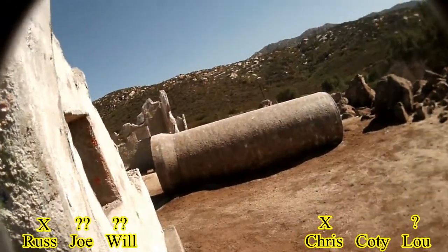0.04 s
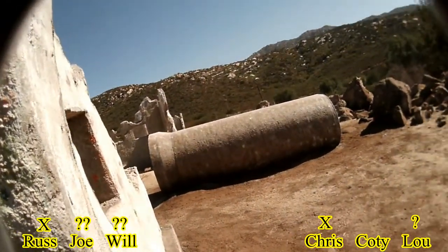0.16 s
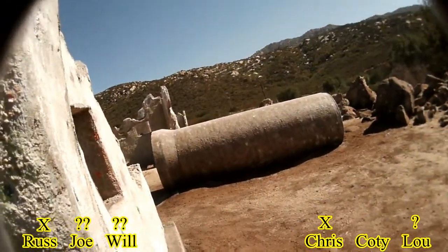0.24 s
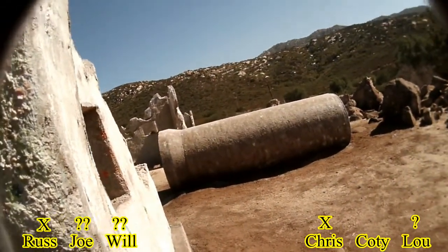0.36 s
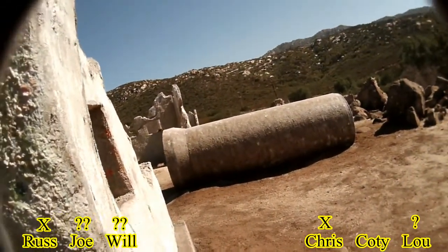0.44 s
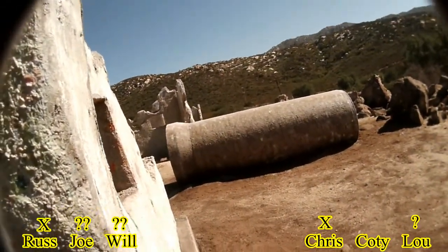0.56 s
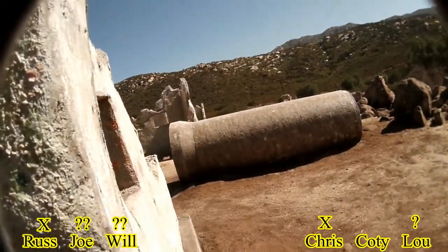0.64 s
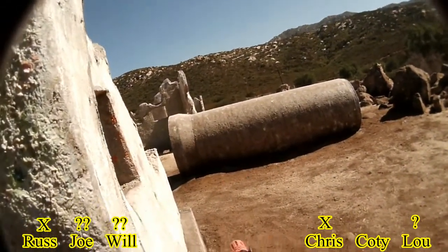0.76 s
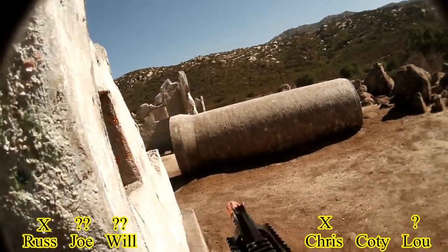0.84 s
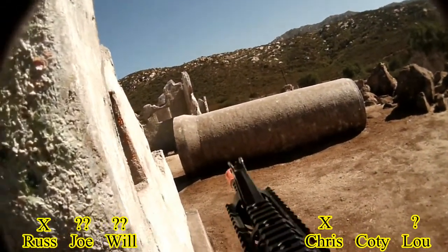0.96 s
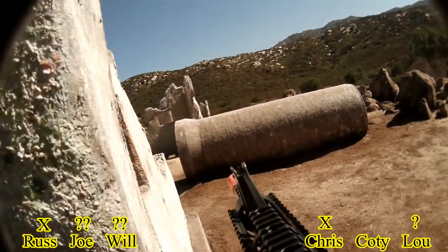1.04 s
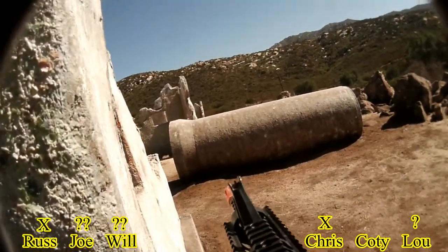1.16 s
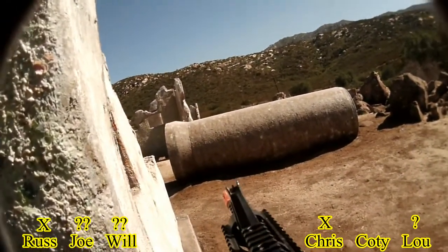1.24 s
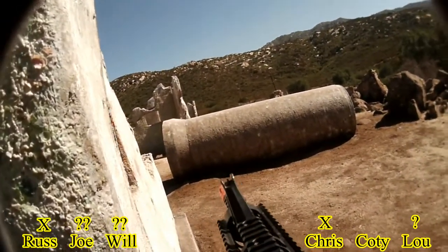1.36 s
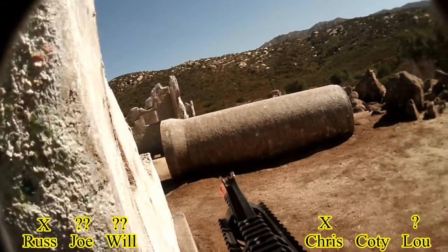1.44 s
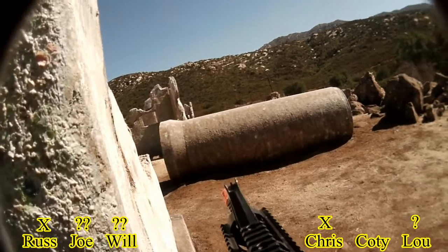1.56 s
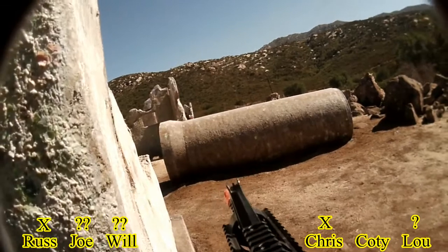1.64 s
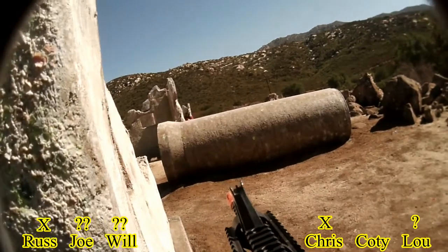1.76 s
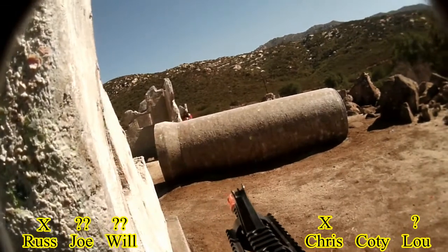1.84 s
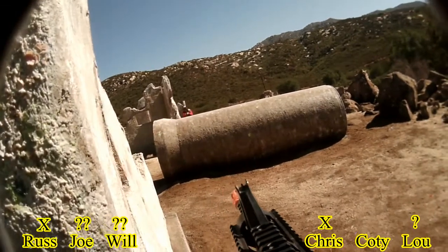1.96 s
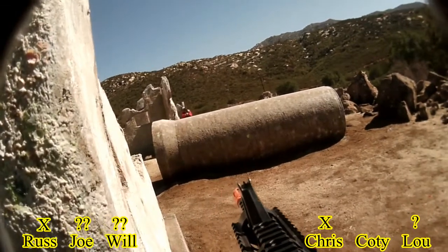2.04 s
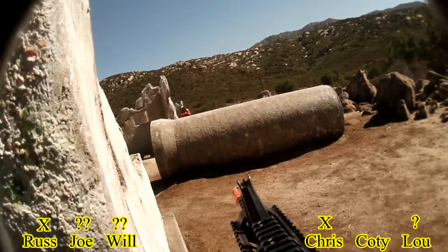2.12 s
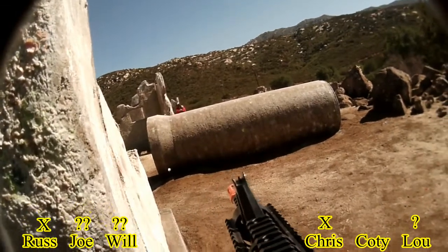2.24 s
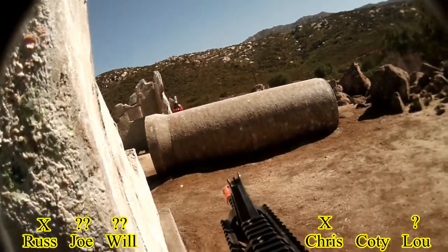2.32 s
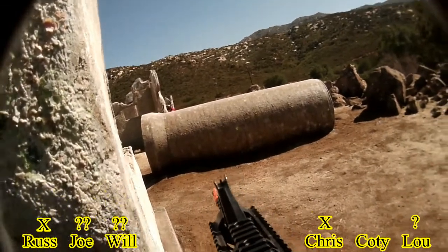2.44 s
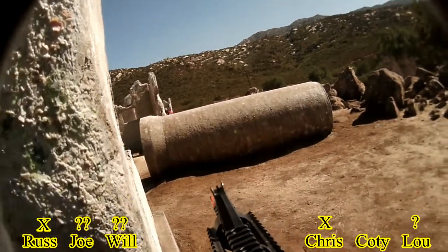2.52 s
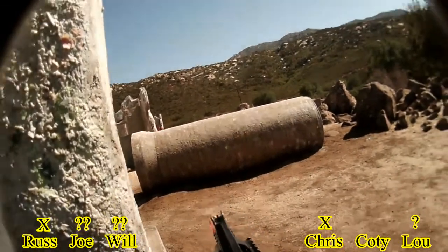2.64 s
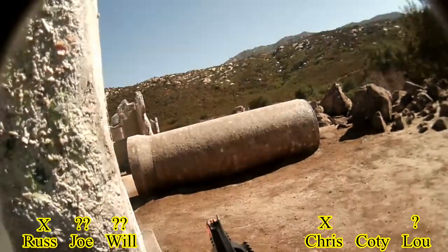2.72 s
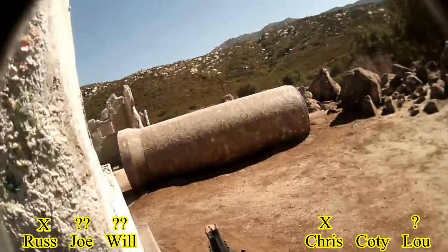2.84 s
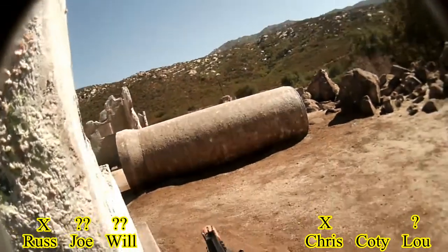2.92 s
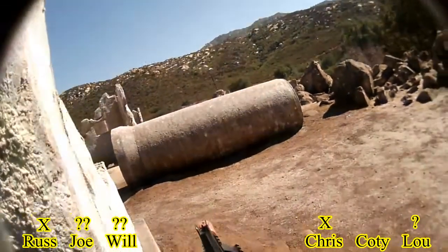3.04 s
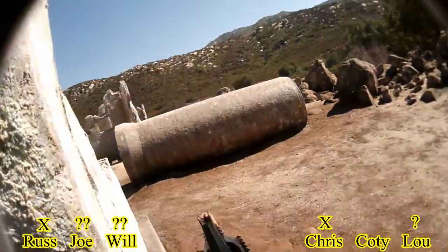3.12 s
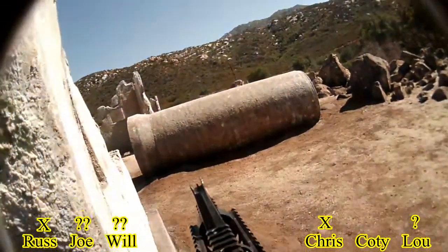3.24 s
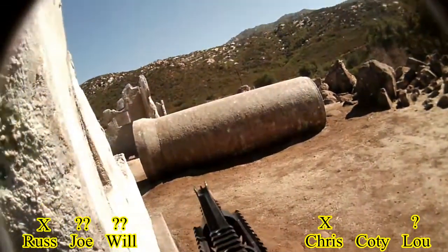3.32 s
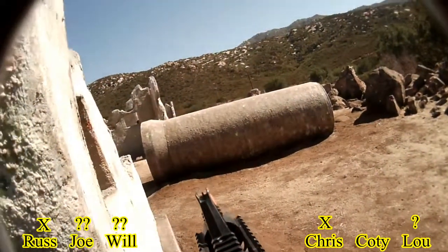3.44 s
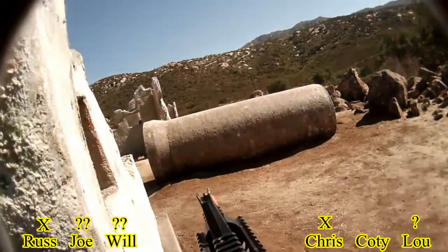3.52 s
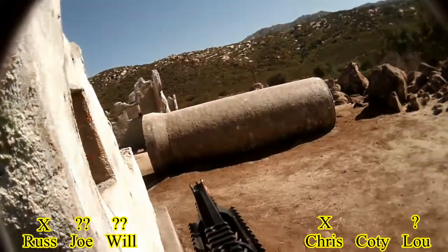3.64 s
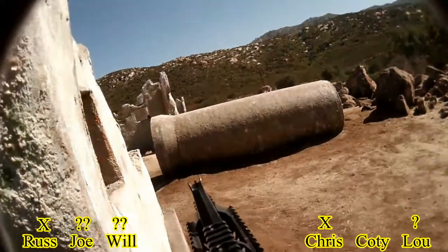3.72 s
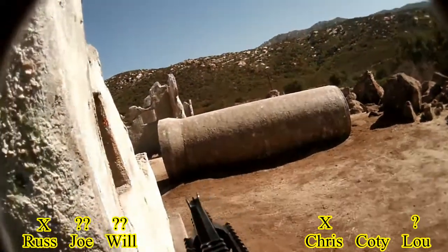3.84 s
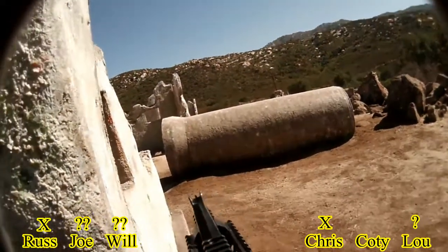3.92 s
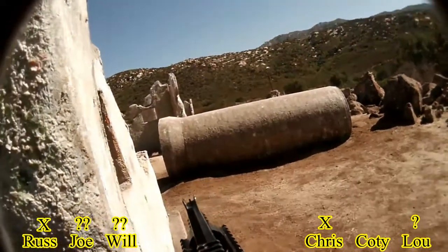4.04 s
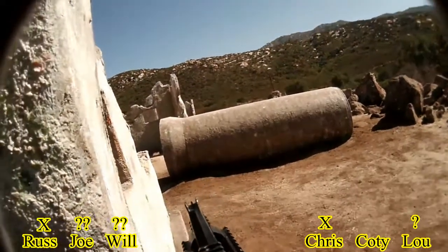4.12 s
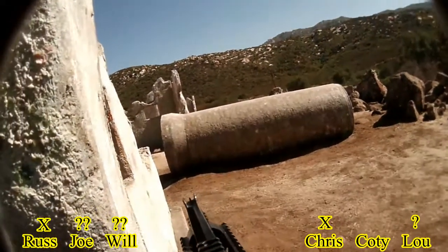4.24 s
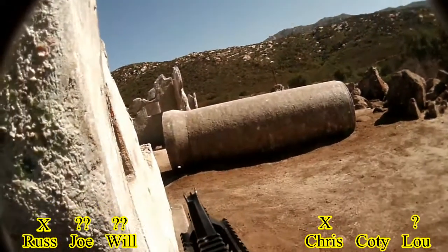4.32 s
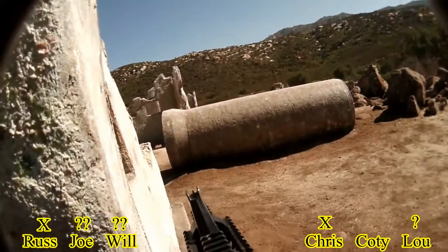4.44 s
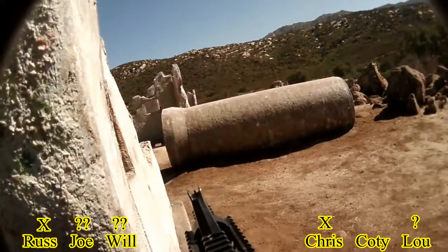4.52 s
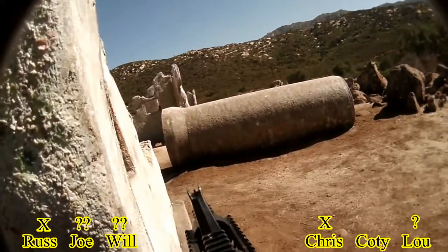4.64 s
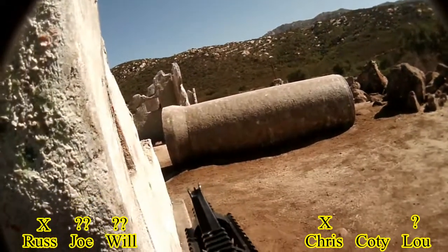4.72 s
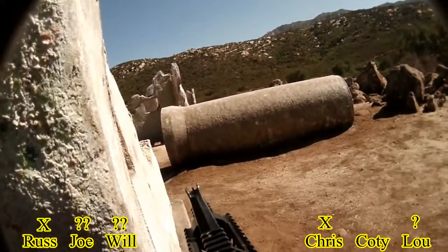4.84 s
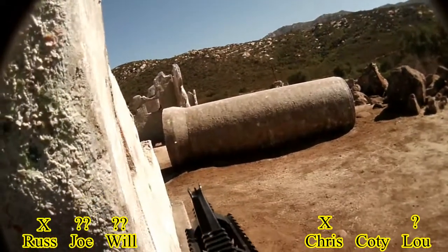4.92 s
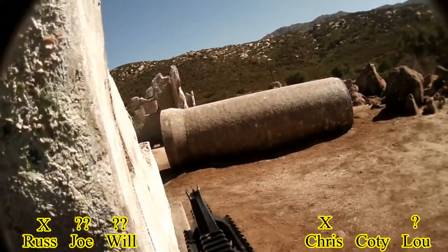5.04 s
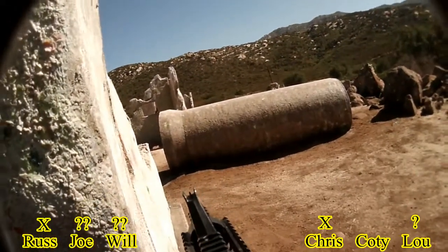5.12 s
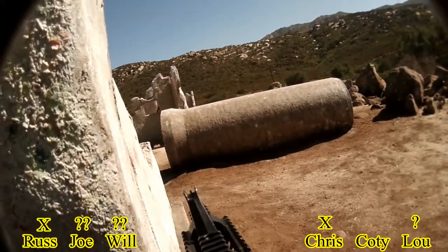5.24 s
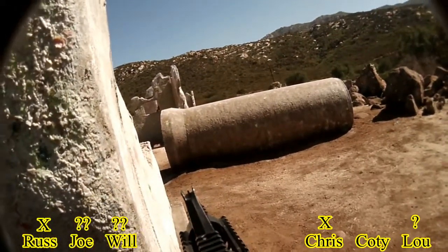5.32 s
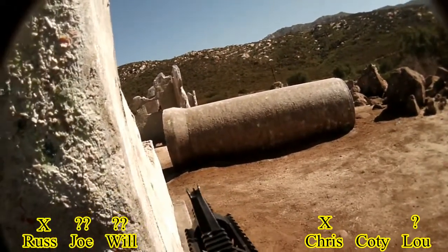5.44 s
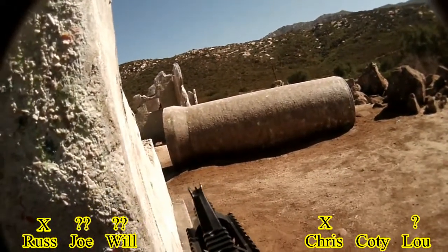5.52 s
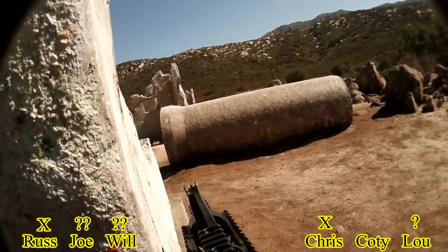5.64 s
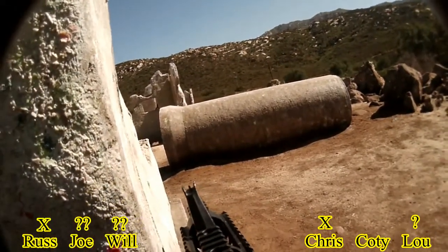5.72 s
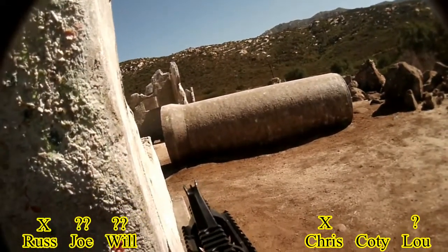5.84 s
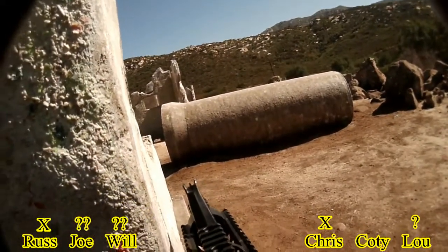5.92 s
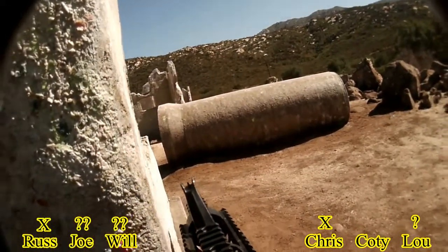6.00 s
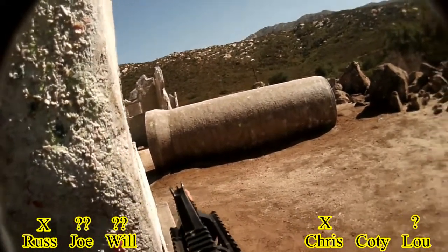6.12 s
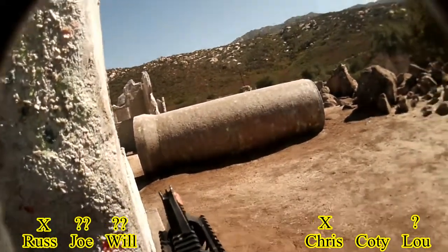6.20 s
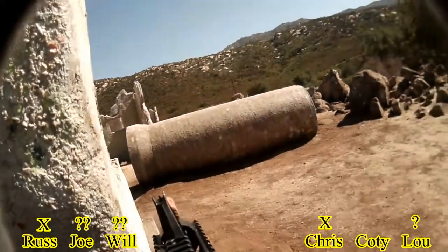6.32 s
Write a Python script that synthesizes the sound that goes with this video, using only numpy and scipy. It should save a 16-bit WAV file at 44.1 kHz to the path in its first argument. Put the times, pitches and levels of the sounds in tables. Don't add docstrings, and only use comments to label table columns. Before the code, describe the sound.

Outdoors, an electric airsoft rifle rattles off five hard mechanical bursts close to the microphone, gears whining, amid gusting wind and rustling gear.

```python
import sys
import numpy as np
from scipy import signal
from scipy.fft import rfft, irfft
from scipy.io import wavfile
from scipy.ndimage import uniform_filter1d

SR = 44100
rng = np.random.default_rng(int(sys.argv[2]) if len(sys.argv) > 2 else 0)


def invert_db(x):
    u = np.asarray(x, float) / 20
    return 10 ** u


def int16_out(signal):
    q = np.round(np.clip(np.atleast_2d(signal).T, -1, 1) * 32767)
    wavfile.write(sys.argv[1], SR, q.astype(np.int16))


N = 280766
TIME = np.arange(N) / SR

# (frequency [Hz], density [dB per Hz])
HISS = [(71, -16.5), (120, -1), (189, -8), (477, -10), (677, -10.5), (885, -13.5), (1510, -20), (2530, -20),
        (2920, -19), (3380, -22), (12400, -29.5), (15200, -35), (16500, -68.5)]
HISS_DB = -55.5
# (time [s], level [dB])
GUSTS = [(0.03, -67), (.12, -37), (.24, -70), (.47, -71), (.55, -39.5), (.82, -44), (.95, -34), (1.1, -52),
         (1.5, -40), (2.49, -28), (2.85, -33.5), (3.25, -34.5), (3.6, -29), (4.1, -35), (4.47, -28.5),
         (4.7, -36), (5.3, -36), (6.14, -35)]
# (frequency [Hz], wander [Hz], level at 0 s [dB], at 1.2 s [dB], at 6.4 s [dB])
ENGINE = [
    (79.4, 0.59, -55, -55, -48.5),
    (140, 1.8, -79, -56.5, -60),
    (253, 3, -72, -65.5, -62),
]
# (start [s], length [s], cloth level [dB], strap minus cloth [dB])
MOVES = [(0.063, 0.16, -48.5, -14.5), (0.584, 0.48, -55.5, -5.5), (1.306, 0.47, -67, -14),
         (2.444, 0.85, -61, -6), (3.575, 0.19, -59, -3), (3.996, 0.13, -60, -7), (4.405, 0.054, -51, -7),
         (4.654, .06, -68, -1), (5.128, 0.044, -43.5, -2.5), (5.215, 0.065, -49, -5),
         (5.78, 0.17, -54, -10), (6.005, 0.43, -58.5, -8), (6.065, 0.083, -59, -9)]
STILL_CLOTH_DB, STILL_STRAP_DB, MOVE_EDGE_S = -66.5, -95, 0.069

# (time [s], peak [dB], frequency [Hz])
THUDS = [(0.517, -31, 61.9), (0.95, -41, 83.4), (2.409, -48, 160), (2.518, -26.5, 99), (3.365, -22, 140),
         (3.582, -23.5, 68), (3.63, -22, 66.4), (4.447, -30, 150), (4.456, -29.5, 288), (5.778, -24, 133),
         (6.124, -38, 80)]
# (time [s], peak [dB], frequency [Hz])
RUBS = [
    (0.119, -53, 560),
    (2.742, -43, 420),
    (3.375, -29.5, 250),
    (6.064, -42, 300),
    (6.092, -35, 453),
    (6.139, -37, 590),
]
# (time [s], peak [dB], low knock minus peak [dB], bright tick minus peak [dB])
KIT = [(0.5684, -44, 6.5, -23.5), (0.633, -39, 1, -18), (0.7454, -45, 3, -12), (1.0908, -51.5, 21, -25),
       (2.5411, -42.5, -8, -19), (2.7457, -49, 10.5, -19), (2.788, -39.5, -10, -17),
       (3.1208, -42, -14, -18), (3.3757, -64.5, 26, -12), (3.6611, -37, -5, -16), (3.6795, -36, -20, -12),
       (4.0716, -40, -13, -8), (4.1045, -46, -14, -16), (4.438, -37, -14, -10), (4.696, -36, -8, -18),
       (5.2287, -36.5, 4, -5), (5.2374, -31.5, 1, -10), (5.2796, -36, -16, -6), (5.3014, -32, -6, -17),
       (5.8346, -37.5, -15, 2.5), (5.9953, -47, -8, -15), (6.0462, -41, -12, -9), (6.144, -41, -7, -9),
       (6.2053, -47, -10, -3)]
# (time [s], peak [dB])
BUCKLE_MODES = [(660, 5, 0.018), (1420, -1, .015), (2820, 3, 0.013)]
BUCKLE_TAPS = [
    (0.6928, -30.5),
]
CLASP_MODES = [(2960, 0, .009), (3940, 1.5, 0.014), (4500, -2, .008), (5400, -7, .007), (7000, -4, .008)]
CLASP_TAPS = [
    (6.038, -56),
    (6.0462, -41),
    (6.06, -50),
    (6.106, -48),
    (6.1444, -44),
    (6.159, -48),
    (6.2053, -51),
]
SLING_RING_MODES = [(2010, -3, 0.04), (3300, 2, .011), (4253, -5, .011), (6540, -4, 0.0091)]
SLING_RING_TAPS = [
    (5.229, -30.5),
]
POUCH_MODES = [(567, 6.5, 0.011), (413, 2, 0.016), (724, -9, 0.024)]
POUCH_TAPS = [
    (6.1095, -30),
    (6.1165, -37),
    (6.1215, -17.5),
]

# (frequency [Hz], level [dB], t60 [s])
HOUSING_KNOCK = [(408, -13, 0.018), (560, -8, 0.02), (703, -2, 0.022), (823, -1.5, 0.022),
                 (1092, -2, 0.018)]
HOUSING_SNAP = [(1510, -12, 0.013), (1800, -3.5, 0.0079), (2020, -3, 0.012), (2350, -4.5, 0.025),
                (2830, -5, 0.036), (3140, -18, 0.006), (3630, -5.5, 0.012)]
# (time [s], peak [dB])
TRIGGER = [
    (1.6857, -18.5),
    (3.689, -21),
    (4.1173, -28),
    (4.7056, -21.5),
    (5.3224, -29),
]
# (time [s], peak
# [dB])
PICKUPS = [(1.7222, -9.5), (1.733, -4.5), (1.816, -8), (1.8936, -4), (1.9697, -4.5), (2.0448, -4),
           (2.121, -5.5), (2.1985, -2), (2.274, -2), (2.358, -5), (2.386, -4), (3.8108, -13), (3.8937, -3),
           (4.2203, -1.5), (4.3062, 1.5), (4.811, -4.5), (4.8968, -5), (4.9764, -5), (5.0644, -22),
           (5.077, -12), (5.109, -19), (5.3359, -6), (5.4437, -14), (5.526, -2.5), (5.6064, -2),
           (5.684, -6)]
# (time [s], peak [dB])
STALL = [
    (2.4159, -19),
    (3.9596, -17),
    (4.3709, -17),
    (5.1308, -12.5),
    (5.747, -16.5),
]
LATCH = [
    (2.4269, -8),
    (3.9729, -5.5),
    (4.3835, -5.5),
    (5.7648, -4.5),
]
BOUNCE = [
    (2.4427, -24),
    (3.9902, -17.5),
    (4.399, -18),
    (5.7788, -18.5),
]
# (low knock minus peak [dB], bright tick minus peak [dB])
PICKUP_TONE = (-11, -15.5)
TRIGGER_TONE = (4, -5)
STALL_TONE = (-14, -3.2)
LATCH_TONE = (-3.5, -11.5)
BOUNCE_TONE = (-8, -30)
# (time [s], peak [dB])
TOOTH_KNOCKS = [(1.6772, -16), (3.6885, -10.5), (3.7085, -22), (3.7155, -13), (3.726, -16), (3.7345, -13),
                (3.7425, -22), (3.751, -8), (3.759, -19), (4.1173, -31), (4.141, -37), (4.148, -32),
                (4.173, -11), (4.7056, -29.5), (4.724, -30), (4.7302, -34), (5.3237, -32), (5.354, -19),
                (5.386, -18)]
# (frequency [Hz], level [dB], t60 [s])
TOOTH_MODES = [(838, 3, 0.018), (1030, -5.5, 0.016), (635, -17, .02), (2240, -7.5, 0.014),
               (2940, -7, 0.011)]

# (motor on [s], spring take-up [s], power off [s], standstill [s], coasting level [dB])
BURSTS = [
    (1.68, .012, 2.362, 2.455, -35),
    (3.69, .07, 3.905, 4.008, -33),
    (4.118, .078, 4.325, 4.418, -34),
    (4.712, .078, 5.03, 5.155, -33),
    (5.312, .035, 5.715, 5.8, -36),
]
# (frequency [Hz], density [dB per Hz])
GRIND = [(200, -20.5), (500, -11.5), (1300, -8.5), (2000, -14), (3500, -15), (4800, -18.5), (5400, -32.5),
         (6500, -19.5), (9000, -32.5), (12500, -28), (14000, -49), (16000, -53)]
SLOW_GRIND = [(300, -34), (470, -13.5), (774, -4.5), (1690, -17.5), (2250, -17.5), (2850, -7.5),
              (3450, -25), (4800, -24), (5350, -38), (7200, -27), (9000, -36), (16000, -55)]
# (frequency [Hz], width [Hz], boost [dB])
RESONANCES = [(756, 530, 13), (1733, 110, 8.5), (2276, 170, 7.5), (2734, 93, -2), (2807, 540, 12.5),
              (4770, 1000, 2.5), (6370, 150, 2), (6860, 1300, 4.5), (8180, 1000, 8.5)]
# (harmonic number, level [dB])
WHINE = [(1, 2.5), (2, -18), (3, -6.5), (4, -18)]
# (frequency [Hz], gain [dB])
RADIATION = [(300, -32), (560, -14), (690, -2), (800, 0), (900, -3), (1000, -9), (1250, -14), (1550, -2),
             (2600, 3), (4000, 0)]

# (time [s], blow [dB], nozzle clack [dB], mesh at end of draw [Hz], clack after slam [ms])
SHOTS = [(1.6981, -3.5, 1.5, 500.0, 49.4), (1.7973, -2.5, 1.5, 700.0, 48.1), (1.8757, -5, 1, 710.0, 47.5),
         (1.9521, -2.5, 0, 720.0, 47.4), (2.028, -2.5, 0, 725.0, 47.4), (2.104, -2.5, 0.5, 725.0, 47.2),
         (2.1798, -3, 1.5, 730.0, 47.2), (2.2563, -3.5, 2, 725.0, 47.6), (2.3326, -4, 1.5, 720.0, 47.6),
         (3.7854, -4, 2.0, 390.0, 48.7), (3.8751, -2.5, 3, 650.0, 48.8), (4.1906, -2, 3, 390.0, 48.6),
         (4.2866, -3.5, 4, 640.0, 47.8), (4.7822, -2, 1.5, 390.0, 48.2), (4.878, -3.5, 2, 660.0, 48.2),
         (4.9579, -3, 1.0, 690.0, 47.1), (5.045, -2.5, 2.5, 690.0, 48.3), (5.4216, -3.5, 2.5, 500.0, 47.9),
         (5.5076, -3, 0, 680.0, 47.7), (5.5872, -2.5, 1, 665.0, 47.9), (5.6662, -2, 0.5, 690.0, 47.7)]
# (time from slam [ms], half width [ms], pressure [full scale])
PUFF = [
    (-10., .38, -.4),
    (-7.7, .4, .13),
    (-4.5, 1.15, .34),
    (-1.75, .95, -.52),
    (1., 1.4, .34),
    (7., 2.1, -.08),
]
# (frequency [Hz], level [dB], t60 [s])
RELEASE = [(944, -24, 0.02), (1500, -16.5, 0.01), (2090, -6.5, 0.017), (2570, -22, 0.013)]
# (frequency [Hz], level [dB], t60 [s])
SHELL = [(336, 15, .01), (425, 14, .011), (627, 0, .05), (745, 15, .015), (911, 15, .015),
         (1909, -12, .028)]
FAR_WALL = [(1055, -5, .042), (1568, 15, .006)]
SIDE_WALL = [(562, 0, 0.026)]
REBOUND = [(682, -5, 0.026), (400, -31, 0.023), (194, -24.5, 0.037)]
# (frequency [Hz], level [dB], t60 [s])
PLATE = [(854, -24.5, 0.019), (2260, -41, 0.064), (2995, -14.5, 0.049), (4720, -30.5, 0.04),
         (6570, -42, 0.02), (8300, -19, 0.039), (8610, -20.5, 0.034), (11000, -25, 0.035),
         (11700, -31, 0.08), (11800, -27, 0.03), (12760, -26.5, 0.039), (13600, -35, 0.034)]
# (frequency [Hz], density [dB per Hz])
CLACK = [(180, -24), (300, -21), (701, 4.5), (1640, -2), (1900, 0.5), (2930, 3), (3400, -7.5), (4670, -2.5),
         (5250, -21), (6000, -5), (9550, -12), (11500, -13.5), (16000, -39)]


def unit(x):
    return x / np.sqrt(np.mean(x ** 2))


def noise():
    return rng.standard_normal(N)


def band(x, lo_hz, hi_hz):
    return signal.sosfilt(signal.butter(2, [lo_hz, hi_hz], "band", fs=SR, output="sos"), x)


def colour(x, spectrum, peaks=()):
    hz = np.fft.rfftfreq(4096, 1 / SR) + 1
    points = np.array(spectrum, float)
    db = np.interp(np.log(hz), np.log(points[:, 0]), points[:, 1])
    for centre, width, boost in peaks:
        db = db + boost / (1 + (2 * (hz - centre) / width) ** 2)
    fold = irfft(np.log(invert_db(db))) * np.r_[1, np.full(2047, 2), 1, np.zeros(2047)]
    response = irfft(np.exp(rfft(fold)))
    return signal.fftconvolve(x, response)[:N]


def walk(rate):
    hold = int(SR / rate)
    steps = np.repeat(rng.standard_normal(N // hold + 1), hold)
    return unit(uniform_filter1d(steps, hold)[:N])


def place(times, shapes):
    out = np.zeros(N + shapes.shape[1])
    for s, shape in zip(times, shapes):
        start = int(s * SR)
        out[start:start + len(shape)] += shape
    return out[:N]


def fade(db, t60, rise_ms):
    t = np.arange(5000) / SR
    return np.outer(invert_db(db), (1 - np.exp(-t * 1000 / rise_ms)) * invert_db(-60 * t / t60))


def ring(times, db, modes, scatter_db, detune, contact_ms):
    t = np.arange(5000) / SR
    hz, mode_db, t60 = np.transpose(modes)[:, None, :, None]
    chance = rng.standard_normal((len(times), len(modes), 2))
    tone = np.sin(2 * np.pi * hz * (1 + detune * chance[..., :1]) * t)
    decay = invert_db(mode_db + scatter_db * chance[..., 1:] - 60 * t / t60)
    total = np.sum(decay * tone, axis=1)
    return place(times, invert_db(db)[:, None] * total * (1 - np.exp(-t * 1000 / contact_ms)))


def grains(rate_hz, spread_db, bed):
    happens, side, size = rng.random((3, N))
    clicks = (happens < rate_hz / SR) * np.sign(side - .5) * invert_db(-spread_db * np.log(1 - size))
    return unit(unit(clicks) + bed * noise())


def hiss_and_rumble():
    hiss = invert_db(HISS_DB) * unit(colour(noise(), HISS))
    rumble = invert_db(-53.0 + 2.2 * walk(12)) * unit(band(noise(), 9.4, 63))
    return hiss + rumble


def engine():
    out = np.zeros(N)
    for hz, wander, *db in ENGINE:
        level = invert_db(np.interp(TIME, [0, 1.2, 6.4], db) + 2 + 1.6 * walk(5.3))
        out += level * np.sin(2 * np.pi * np.cumsum(hz + wander * walk(7)) / SR)
    return out


def wind():
    # (low edge [Hz], high edge [Hz], level [dB], flutter [Hz])
    eddies = [(22, 61, -7.5, 18), (68.0, 112.0, -8.5, 50), (99, 199, -5.5, 23), (167, 363, -14.0, 47)]
    turbulence = sum(invert_db(db + 1.96 * walk(rate)) * unit(band(noise(), lo, hi)) for lo, hi, db, rate in eddies)
    return invert_db(np.interp(TIME, *np.transpose(GUSTS)) - 10.5) * turbulence


def clothing():
    start, length, move_db, less_db = np.transpose(MOVES)[..., None]
    moving = np.clip(np.minimum(TIME - start, start + length - TIME) / MOVE_EDGE_S + .5, 0, 1)
    cloth_level = invert_db(STILL_CLOTH_DB) + np.sum(moving * invert_db(move_db), axis=0)
    strap_level = invert_db(STILL_STRAP_DB) + np.sum(moving * invert_db(move_db + less_db), axis=0)
    cloth = cloth_level * invert_db(1.8 * walk(25)) * unit(band(band(grains(400, 1.2, 1.6), 450, 1000), 450, 1000))
    fibres = grains(460, 1.7, 0.68)
    webbing = unit(band(fibres, 1860, 2750) + band(fibres, 2610, 2960))
    return cloth + strap_level * invert_db(0.78 * walk(26)) * webbing


def bumps():
    rubs = [(s, db + 3.0, hz) for s, db, hz in RUBS]
    s, db, hz = np.transpose(THUDS + rubs)
    tone = np.sin(2 * np.pi * np.outer(hz, np.arange(5000) / SR))
    return place(s, fade(db, 0.044, 1.0) * tone)


def taps():
    # (taps, modes, contact [ms])
    parts = [(TOOTH_KNOCKS, TOOTH_MODES, 1.6), (BUCKLE_TAPS, BUCKLE_MODES, .4), (CLASP_TAPS, CLASP_MODES, .4),
             (SLING_RING_TAPS, SLING_RING_MODES, .4), (POUCH_TAPS, POUCH_MODES, 1.5)]
    return sum(ring(*np.transpose(rows), modes, scatter_db=3.0, detune=0.016, contact_ms=ms)
               for rows, modes, ms in parts)


def contacts():
    parts = [(PICKUPS, PICKUP_TONE), (TRIGGER, TRIGGER_TONE),
             (STALL, STALL_TONE), (LATCH, LATCH_TONE), (BOUNCE, BOUNCE_TONE)]
    return [(*row, *tone) for rows, tone in parts for row in rows] + list(KIT)


def clicks():
    s, db, low_db, high_db = np.transpose(contacts())
    snap = ring(s, db - 6.5, HOUSING_SNAP, scatter_db=2.5, detune=0.0536, contact_ms=0.39)
    knock = ring(s, db + low_db, HOUSING_KNOCK, scatter_db=1.5, detune=0.03, contact_ms=1.0)
    scrape = unit(band(noise(), 1177, 3100)) * place(s, fade(db - 18.0, 0.058, 0.27))
    tick = unit(band(noise(), 3700, 9700)) * place(s, fade(db + high_db - 11.0, 0.05, 0.078))
    return snap + band(knock, 280, 2200) + scrape + tick


def mesh():
    sag, draw_s, spin_s = .4, .06, .027
    s, end_hz = np.array(SHOTS)[:, [0, 3]].T
    last = np.r_[np.diff(s) > .12, True]
    release = np.r_[s - .01, s[last] + .07]
    order = np.argsort(release)
    following = order[np.minimum(np.searchsorted(release[order], TIME), len(order) - 1)]
    slack = np.clip((release[following] - TIME) / draw_s, 0, 1)
    starts = np.array([burst[0] for burst in BURSTS])
    current = np.maximum(np.searchsorted(starts, TIME) - 1, 0)
    running = np.maximum(TIME - starts[current], 0)
    hz = np.r_[end_hz, end_hz[last]][following] * (1 + sag * slack) * (1 - np.exp(-running / spin_s))
    turns = np.cumsum(uniform_filter1d(hz, 300) * (1 + .006 * walk(150))) / SR
    return turns, uniform_filter1d(slack, size=300)


def rack(turns):
    tooth = turns / 3
    size = invert_db(2.5 * rng.standard_normal(N // 50))[tooth.astype(int)]
    return unit(.55 + size * np.exp(-(tooth % 1) / .28))


def whine(turns, slack):
    spring_db = 28 * (.3 - np.abs(slack - 0.21))
    tone = sum(invert_db(db + spring_db / k + 1.3 * walk(45)) * np.sin(2 * np.pi * k * turns) for k, db in WHINE)
    return colour(tone, RADIATION)


def motor_levels():
    first_draw_s, full_speed_s, slow_down_s, stop_s = .082, .13, .035, .02
    rest_db, draw_db, run_db, stop_db = -41, -21.5, -17, -14
    hum_above_grind_db = [4.5, -4.5, -4.5, -2.5]
    level, hum, fast = np.zeros((3, N))
    for on, take_up, off, stop, coast_db in BURSTS:
        s = [on, on + min(take_up, first_draw_s), on + first_draw_s, on + full_speed_s,
             off, off + slow_down_s, stop - stop_s, stop]
        stages = [rest_db, draw_db, draw_db, run_db, run_db, coast_db, coast_db, coast_db + stop_db]
        db = np.interp(TIME, s, stages)
        hum_s = [on + take_up / 2, on + full_speed_s, off, off + slow_down_s]
        hum_db = np.interp(TIME, hum_s, hum_above_grind_db)
        edge = np.clip(np.minimum(TIME - on, stop - TIME) / 0.0036, 0, 1)
        fast += edge * np.interp(TIME, [on + take_up + 0.012, on + take_up + 0.039], [0, 1])
        level += edge * invert_db(db)
        hum += edge * invert_db(db + hum_db)
    return level, hum, fast


def gears():
    level, hum, fast = motor_levels()
    since_ms = np.arange(2200) / SR * 1000 - 24
    light = np.clip(np.minimum((since_ms + 36.3) / 50.0, (18.5 - since_ms) / 8.0), 0, 1)
    load = invert_db(-7. * place(np.array(SHOTS)[:, 0] - 24 / 1000, np.tile(light, (len(SHOTS), 1))))
    turns, slack = mesh()
    seat = rack(turns)
    quick = unit(colour(seat * grains(840, 2.1, 1.12), GRIND, RESONANCES))
    slow = invert_db(0.5) * unit(colour(seat * grains(1500, 1.4, 2.6), SLOW_GRIND))
    grind = fast * quick + (1 - fast) * slow
    shell = unit(band(grains(240, 3.7, 1.0), 625, 940)) * invert_db(6.5 * walk(60))
    uneven = invert_db(1.2 * walk(110))
    singing = invert_db(-20.0) * shell + invert_db(-0.25) * whine(turns, slack)
    return load * level * invert_db(3.0) * uneven * grind + load ** 0.36 * hum * singing


def air_puff(s, blow_db):
    ms = np.arange(1100) / SR * 1000 - 13
    puff = sum(size * np.exp(-((ms - at) / width) ** 2) for at, width, size in PUFF)
    puff = puff - puff.mean() * 2 * np.hanning(len(ms))
    strength = invert_db(blow_db / 2 + .8 * rng.standard_normal(len(s)))
    return place(s - .013, np.outer(strength, puff))


def piston_slam(s, blow_db):
    hit = s + -1. / 1000
    out = ring(hit, blow_db, SHELL, scatter_db=.8, detune=.005, contact_ms=2.)
    out -= ring(hit, blow_db, FAR_WALL, scatter_db=1.5, detune=.008, contact_ms=2.)
    out += ring(s, blow_db, SIDE_WALL, scatter_db=-2.5, detune=0.024, contact_ms=0.5)
    out += ring(s + 8.7 / 1000, blow_db, REBOUND, scatter_db=2.5, detune=0.02, contact_ms=1.0)
    out += ring(s - .0108, blow_db, RELEASE, scatter_db=3.0, detune=0.07, contact_ms=0.6)
    crack = unit(colour(noise(), GRIND, RESONANCES))
    out += crack * place(s - .0008, fade(blow_db - 0.75, 0.045, 0.27))
    return signal.sosfilt(signal.butter(2, 70, "high", fs=SR, output="sos"), out)


def nozzle_clack(home, clack_db):
    steel = ring(home, clack_db, PLATE, scatter_db=1.5, detune=0.015, contact_ms=0.43)
    rattle = unit(colour(grains(3000, 1.3, 1.0), CLACK))
    return steel + rattle * place(home, fade(clack_db - 11.0, 0.061, 0.33))


def shots():
    s, blow_db, clack_db, _, clack_ms = np.transpose(SHOTS)
    return air_puff(s, blow_db) + piston_slam(s, blow_db) + nozzle_clack(s + clack_ms / 1000, clack_db)


def scene():
    rifle = shots() + gears()
    contact = clicks() + taps() + bumps()
    background = wind() + engine() + clothing() + hiss_and_rumble()
    return (rifle + contact + background)[None]


def low_pass(x):
    return signal.sosfilt(signal.butter(12, 16800, fs=SR, output="sos"), x)


def record(dry):
    overload, knee = .5, 8.4
    flat = dry / (1 + np.abs(dry / overload) ** knee) ** (1 / knee)
    top_cut = signal.ellip(8, .2, 70, 15750, fs=SR, output="sos")
    cut = signal.sosfilt(top_cut, flat)
    ending = np.clip((TIME[-1] - .0005 - TIME) / 0.00079, 0, 1)
    return low_pass((cut - .001) * ending)


dry = scene()
out = record(dry)
int16_out(out)
```